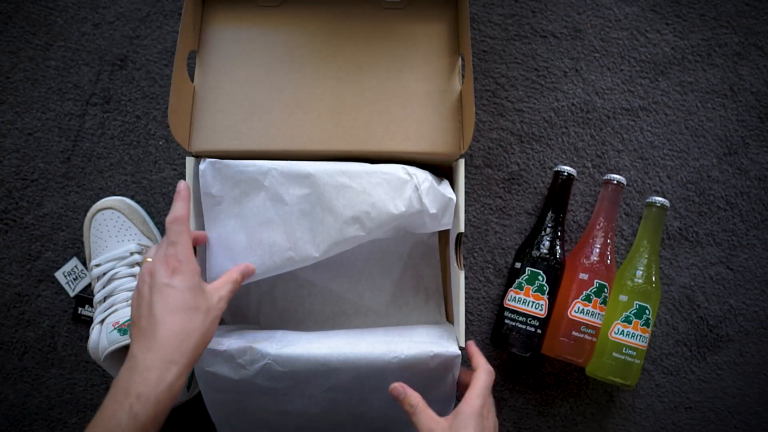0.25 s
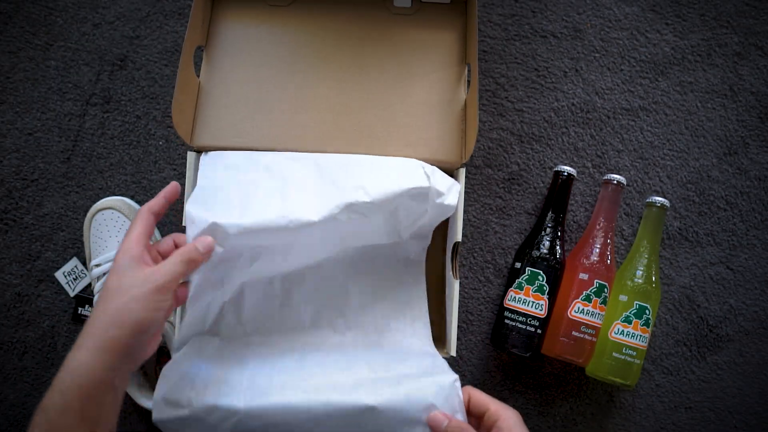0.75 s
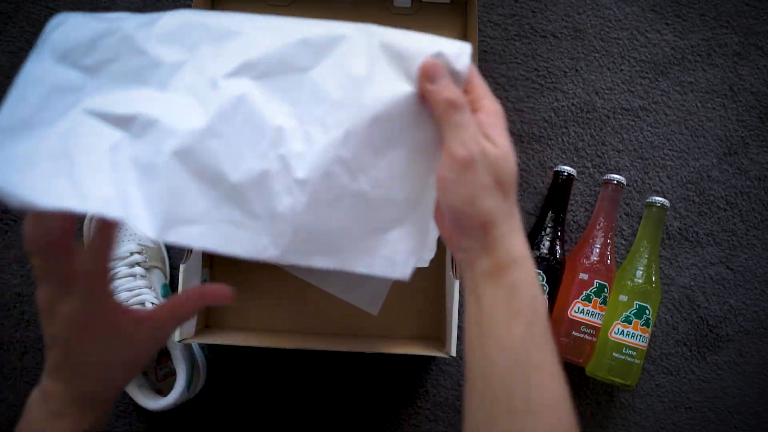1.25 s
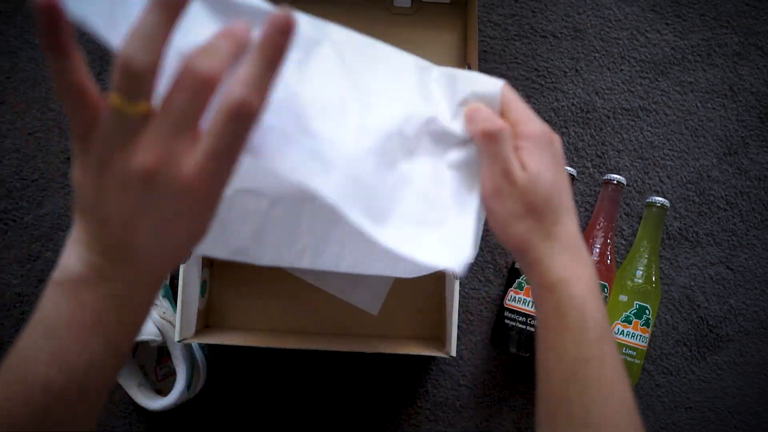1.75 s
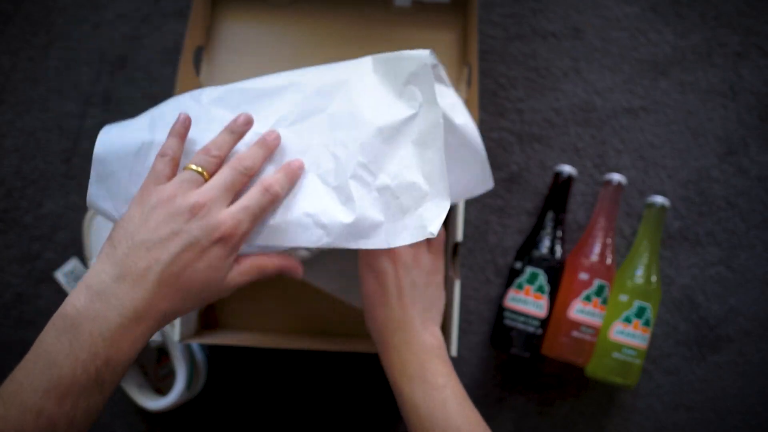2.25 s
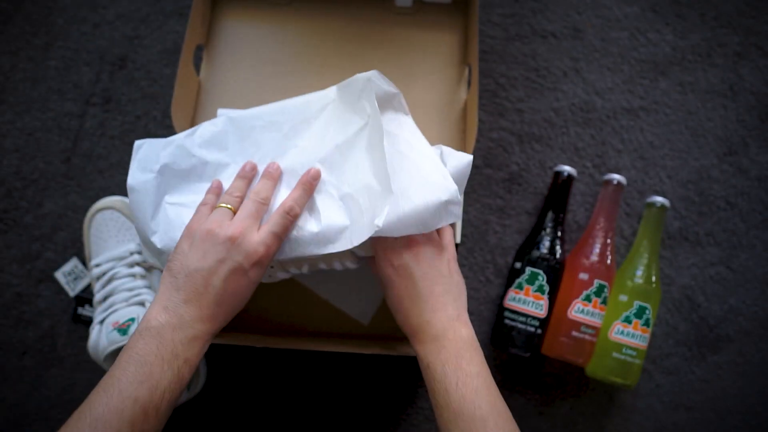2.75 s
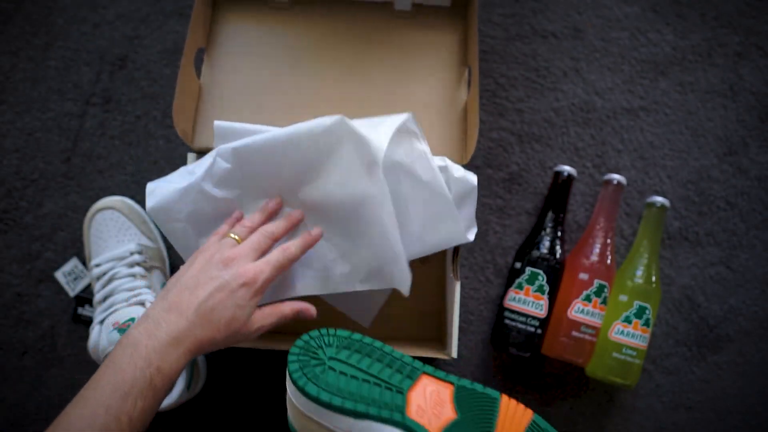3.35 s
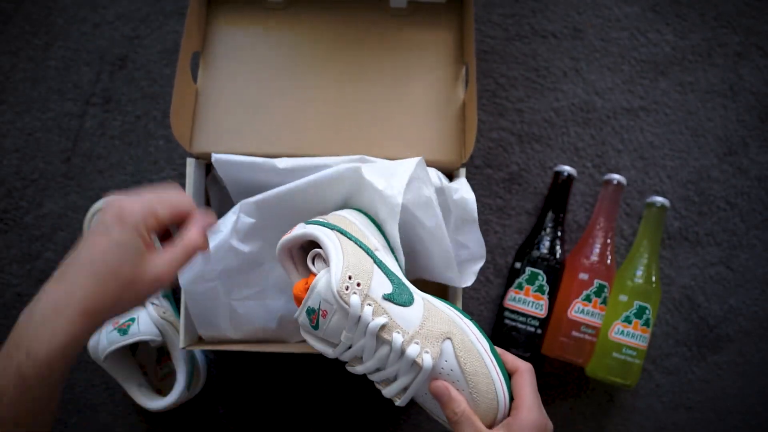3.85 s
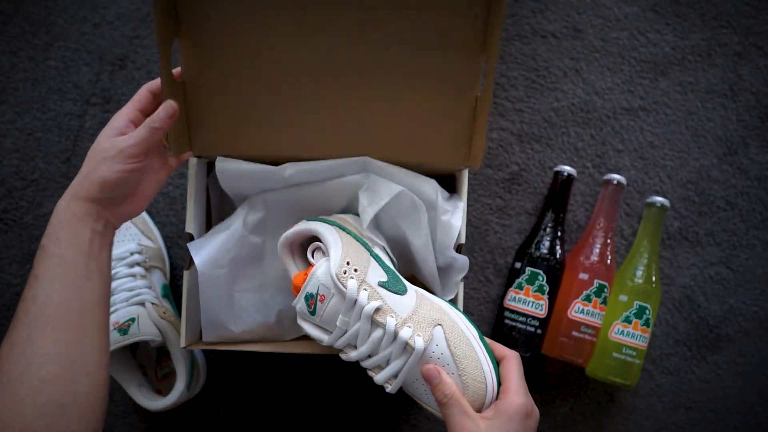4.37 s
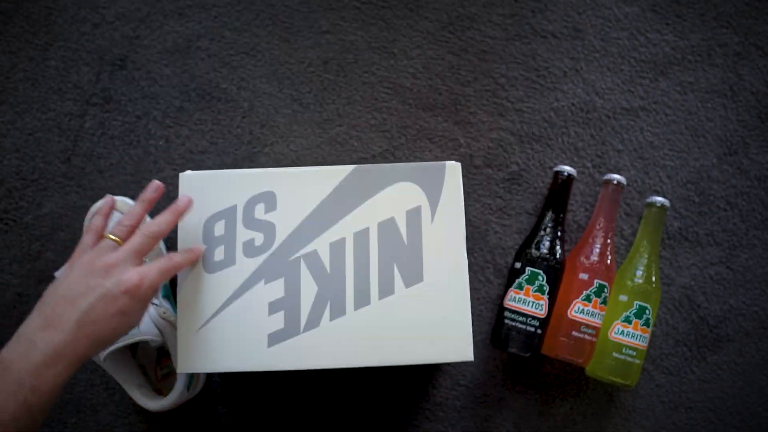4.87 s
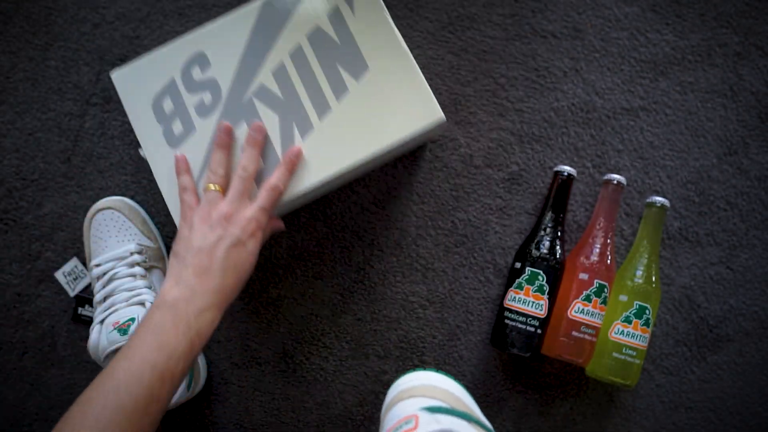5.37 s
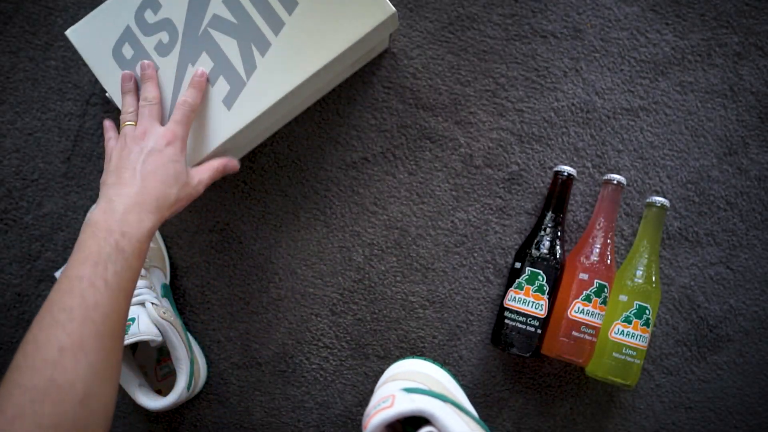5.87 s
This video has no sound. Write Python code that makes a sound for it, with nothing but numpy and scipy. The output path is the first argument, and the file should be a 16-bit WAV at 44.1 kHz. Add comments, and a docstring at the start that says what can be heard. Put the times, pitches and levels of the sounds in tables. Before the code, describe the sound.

Tissue paper dominates, bright and near: gusts of tiny crackles, larger creases snapping, loose sheets flapping. Hollow knocks sound on the box midway as a shoe comes out. After a last burst of crumpling come sparse slides and a soft lid closure, then quiet finger taps, rubbing and a short rough push over carpet, in a small carpeted room heard in close stereo.

```python
"""Close to a cardboard shoe box in a small, soft room: hands fold back its tissue paper, which rustles as a
swarm of tiny buckling creases while large creases snap; a shoe is lifted out and knocks ring the panels. Then,
as the lid closes, the paper mostly swishes, by band noise that is mostly even sliding, and a few creases still
snap. Last, nails click and skin rubs on the lid, and the box is pushed over carpet in stick-slip noise. Faint
air noise lies under it all; a stereo microphone with two ports hears it."""
import sys
import numpy as np
from scipy import signal
from scipy.fft import rfft, irfft, next_fast_len
from scipy.io import wavfile
from scipy.ndimage import uniform_filter1d, map_coordinates

SR = 44100
rng = np.random.default_rng(int(sys.argv[2]) if len(sys.argv) > 2 else 0)


def persist_wave(psi):
    """Save psi, clipped to +-1, as 16-bit WAV."""
    counts = np.round(np.clip(psi, -1, 1) * 32767).astype(np.int16)
    wavfile.write(sys.argv[1], SR, np.atleast_2d(counts).T)


N = 269705
TIME = np.arange(N) / SR
TOP_HZ = 16100  # top of the rustle and of the recorder

# large creases snapping: t/s, level over 6 ms before colouring/dB, crack re sheet ring/dB,
# power decay time/ms, left minus right/dB
LARGE_CREASES = [(0.3451, -28, 28, 3.9, 9.5), (0.3688, -28, 16, 1, 0), (0.3832, -19, 19.5, 3, 3.5),
                 (0.4772, -17, 18.5, 2.5, 2), (0.504, -20.5, 18.5, 1.8, 3), (0.5257, -19.5, 11, 1.5, 2),
                 (0.6597, -21, 3, 1, 0), (0.6995, -20.5, 20, 1.6, 3), (0.848, -32, 7, 0.6, -6.5),
                 (0.8623, -25.5, 3, 2.1, 0.5), (0.879, -22.5, 46, 0.81, -10),
                 (0.8925, -21.5, 17.5, 1.7, 7.5), (0.954, -23, 27, 0.74, 5.5),
                 (1.016, -22.5, -3, 0.9, -1.5), (1.1013, -23, -3.5, 2.8, 0), (1.1597, -17, -2, 1.8, 1.5),
                 (1.222, -23, 14, 1.6, 5), (1.3443, -25.5, 26, 2.2, -12.5), (1.3965, -17, 10.5, 5.5, -1),
                 (1.451, -24.5, 16, 1.4, -1), (1.5123, -21, 17.5, 0.42, 2.5), (1.5514, -18, -6, 1.6, -1.5),
                 (1.651, -26, -2, 2, -3), (1.6647, -23.5, 7, 0.99, -4), (1.7058, -20, 5, 1.7, -.5),
                 (1.7687, -20, 9, 2.4, 1.5), (1.8393, -18.5, -1, 4.6, -0.5), (1.8227, -20.5, 10, 0.4, 1),
                 (1.9511, -26, 3.5, 1.2, 4.5), (2.1591, -16.5, 3, .55, 0.5), (2.1683, -28.5, 12.5, 0.54, 0),
                 (2.2053, -22, -1.5, 2.5, 6), (2.2483, -18, -5, 4.5, -4.5), (2.3997, -24, -3.5, 2, 1),
                 (2.4416, -27.5, 12, 4.1, 1.5), (2.5561, -23, -1, 2.5, -1.5),
                 (2.6075, -19.5, -7.5, 2.8, -1), (2.6392, -24, 10, 0.86, -4.5),
                 (2.707, -17.5, -1.5, 0.91, -.5), (2.807, -26.5, 15, 1.1, -1), (2.9824, -30.5, -13, 1.2, 2),
                 (3.0015, -21.5, 9, 1.2, -0.5), (3.027, -23.5, 10.5, 0.95, -2), (3.0615, -19, -11, 1.1, 2),
                 (3.086, -21, 15, 3.2, 2), (3.1166, -23, 3, 0.84, 0.5), (3.1507, -20, 4, 0.88, 2),
                 (3.2224, -24, -17, 1.8, -1), (3.32, -26.5, 2.5, 0.55, 0), (3.378, -23, 1, 3.3, 0.5),
                 (3.4423, -24, 2, 2, -5.5), (3.4684, -19, 1, 1.4, -3), (3.571, -18.5, 11, 2.5, -2),
                 (3.808, -36.5, -12, 5.4, -1), (3.8526, -19.5, -3.5, 5.6, 1.5), (3.8603, -17, 7, 5.4, 1),
                 (3.8961, -20, -15, 8.4, 1), (3.9258, -20.5, -6.5, 3, 0.5), (3.9727, -20.5, 2, 3.4, 1.5),
                 (4.0487, -22, 0, 4.2, 0), (4.0574, -25.5, 5, 0.98, 2), (4.09, -27, 3, 0.98, 4.5),
                 (4.1115, -17, 0.5, 3.5, 1), (4.1291, -22.5, 5.5, 1.5, 4.5), (4.168, -35.5, -7, 1.6, 7),
                 (4.2425, -40, -23, 1.3, 1.5), (4.361, -31.5, 5, 2.5, -3), (4.465, -39.5, -12, 1.9, -1),
                 (4.5574, -20.5, 0.5, 2.1, 2), (4.6927, -21, 5, 1.6, -6.5), (4.953, -32, 0.5, 3, 2)]
# hands bend and crush the sheet: t/s, swell/s, held/s, level/dB, crispness (treble)/dB, flap (bass)/dB
CRUSHES = [(.347, 0.0044, .12, -37, 1.5, -11), (.48, .006, 0.068, -28, 1.5, -10.5),
           (.58, 0.0094, 0.063, -34.5, -1.5, -19.5), (.658, 0.0039, 0.11, -31, -3, -12.5),
           (.765, 0.014, 0.013, -26, -1, -10.5), (.81, .01, 0.079, -28, -2, -16),
           (1.02, .006, 0.01, -27.5, -15.5, -16.5), (1.098, 0.013, 0.17, -30, -8, -14),
           (1.33, 0.011, 0.08, -31.5, -1, -14.5), (1.4, 0.0071, .16, -31, -1, -12.5),
           (1.6, 0.013, 0.065, -36.5, -2, -16), (1.72, .005, .035, -38, -3, -20),
           (1.835, 0.038, 0.043, -27, -0.5, -16.5), (2.074, 0.025, 0.0065, -32, -10, -27),
           (2.125, 0.021, 0.066, -27, -3.5, -19), (2.2, 0.0073, 0.064, -26.5, -2, -16.5),
           (2.335, 0.036, 0.083, -31, -8, -13.5), (2.44, .008, 0.083, -35, -4, -9.5),
           (2.56, 0.01, 0.092, -32.5, -3, -15.5), (2.695, 0.014, 0.052, -29, -2.5, -15.5),
           (2.775, 0.011, 0.063, -33, -5.5, -11), (2.87, 0.0099, 0.12, -37, -6, -4),
           (3.03, 0.017, 0.19, -41, 2, -17.5), (3.157, 0.012, 0.057, -29.5, -0.5, -8),
           (3.378, 0.037, 0.045, -35, -1, -18.5), (3.435, 0.011, 0.12, -30.5, -1, -14.5),
           (3.855, 0.0028, 0.077, -33, 1, -10.5), (3.95, 0.011, 0.19, -36.5, 1.5, -10)]
# the sheet slides over itself, the shoe or the closing lid: t/s, swell/s, held/s, level/dB,
# crispness (treble)/dB, flap (bass)/dB
SLIDES = [(0.1, 0.0057, 0.0018, -34.5, 0.5, -43), (.305, .004, .03, -61, -8, -20),
          (3.25, .02, 0.043, -44.5, 0, -15), (3.645, 0.016, 0.11, -42.5, -3, -18),
          (4.358, 0.025, 0.035, -42.5, -0.5, -20), (4.47, 0.042, 0.14, -45, -12.5, -17),
          (4.552, 0.046, 0.138, -37.5, 4, -13.5), (4.694, .004, 0.024, -27.5, -12, -19.5),
          (4.775, 0.022, 0.023, -39, -3.5, -30), (4.814, .007, 0.069, -37.5, 6, -25),
          (4.907, 0.044, 0.021, -32.5, -5.5, -8)]


def undb(db):
    """Decibels to gain."""
    return 10 ** (np.asarray(db) / 20)


def unit(x):
    """Scale to rms 1."""
    return x / np.sqrt(np.mean(x ** 2))


def at(points, hz):
    """Read a curve on a log-frequency axis."""
    f, value = np.transpose(points)
    return np.interp(np.log(np.maximum(hz, 1)), np.log(f), value)


def colour(x, points, size=2048):
    """Causal minimum-phase filter with the given spectrum; white noise keeps its power."""
    cepstrum = irfft(np.log(undb(at(points, np.fft.rfftfreq(size, 1 / SR)))))
    # fold the cepstrum onto positive time
    cepstrum[1:size // 2] *= 2
    cepstrum[size // 2 + 1:] = 0
    response = irfft(np.exp(rfft(cepstrum)))
    response = response[None] / np.linalg.norm(response)
    return signal.oaconvolve(x, response, axes=-1)[:, :x.shape[-1]]


def ears(pair):
    """Two unrelated signals become left and right: alike in the bass, apart in the treble."""
    # how unlike the two ears are: f/Hz, side re mid/dB
    side_level = [(100, -18.5), (300, -16.5), (700, -9), (1400, -9.5), (2800, -7), (5500, -3.5),
                  (14000, -3)]
    size = next_fast_len(N + SR // 10)
    mid, side = rfft(pair, size)
    width = undb(at(side_level, np.fft.rfftfreq(size, 1 / SR)))
    left_right = np.array([mid + width * side, mid - width * side])
    return irfft(left_right / np.sqrt(1 + width ** 2), size)[:, :N]


def add(track, s, sound):
    """Mix a sound in at a time."""
    start = max(int(s * SR), 0)
    part = track[:, start:start + sound.shape[-1]]
    part += sound[..., :part.shape[-1]]


def walk(rate):
    """Smooth random drift with `rate` knots a second, spread near 1."""
    knots = rng.standard_normal(int(N / SR * rate) + 2)
    line = np.interp(TIME * rate, np.arange(len(knots)), knots)
    return 1.2 * uniform_filter1d(line, int(SR / rate / 2))


def grains(rate, spread_db):
    """Sizes of random tiny clicks, `rate` a second: many small, a few large."""
    size_db = spread_db * np.minimum(rng.exponential(size=N), np.pi)
    return (rng.random(N) < rate / SR) * undb(size_db)


def swarm(clicks, ring_s, even_s):
    """Envelope of clicks that each ring briefly; its mean power stays near 1."""
    keep = np.exp(-1 / (ring_s * SR))
    power = signal.lfilter([1 - keep], [1, -keep], clicks ** 2) + 1e-6
    return np.sqrt(power / uniform_filter1d(power, int(even_s * SR) + 1))


def movement(s, swell_s, held_s, db, sag_db_per_s, release_s, settle_db, settle_s):
    """Power of one hand movement: a swell, a sagging hold, release and a faint settling tail."""
    since = TIME - s
    before = np.maximum(-since, 0)
    after = np.maximum(since - held_s, 0)
    hold = undb(db - sag_db_per_s * np.clip(since, 0, held_s))
    release = np.exp(-after / release_s)
    settling = undb(settle_db) * np.exp(-after / settle_s)
    return (hold * np.exp(-before / swell_s) * np.maximum(release, settling)) ** 2


def friction(table, shape, spectrum, rate, spread_db):
    """Two surfaces catch and slip in tiny uneven steps."""
    level = np.sqrt(sum(movement(*row, **shape) for row in table))
    slips = swarm(grains(rate, spread_db), ring_s=0.0014, even_s=0.094)
    return ears(colour(rng.standard_normal((2, N)) * slips * level, spectrum))


def still_air(level_db=-70.5):
    """Steady coloured noise for the still air around the box."""
    # noise of the air: f/Hz, level/dB
    air_spectrum = [(25, -20.5), (80, -11), (200, -4.5), (450, 3), (1000, 4), (2700, -5), (6000, -12),
                    (12000, -4.5), (16000, -22.5)]
    noise = ears(colour(rng.standard_normal((2, N)), air_spectrum))
    return undb(level_db) * unit(noise)


def room(x, level_db=-12, t60_s=0.4, treble_t60_s=0.38, gap_s=0.0058, split_hz=4500, treble_db=-4):
    """Walls answer after a path of some two metres; the carpet swallows the treble first."""
    t = TIME[:SR // 2]
    noise = rng.standard_normal((2, len(t)))
    low = signal.sosfilt(signal.butter(2, split_hz, fs=SR, output="sos"), noise)
    high = signal.sosfilt(signal.butter(2, split_hz, "high", fs=SR, output="sos"), noise[::-1])
    fade = np.exp(-np.log(1000) * t / t60_s) * (t > gap_s)
    treble_fade = np.exp(-np.log(1000) * t / treble_t60_s) * (t > gap_s)
    response = (low * fade + undb(treble_db) * high * treble_fade) / np.linalg.norm(fade)
    mono = x.mean(axis=0)[None]
    return undb(level_db) * ears(signal.fftconvolve(mono, response, axes=-1)[:, :N])


def carpet_shoves():
    """The card bottom of the box catches and slips over carpet as the box is shoved."""
    # shoves: t/s, swell/s, held/s, level/dB
    pushes = [(5.755, 0.031, 0.035, -43.5), (5.808, 0.0054, 0.0056, -34), (5.943, 0.0024, 0.0065, -49)]
    # card on carpet: f/Hz, level per Hz/dB
    card_spectrum = [(30, -36), (70, -23.5), (140, -14), (350, 4), (700, 2), (1000, 6), (1600, 4),
                     (2500, -0.5), (4000, -11.5), (7000, -28), (16000, -29)]
    shape = dict(sag_db_per_s=13, release_s=0.0091, settle_db=-28, settle_s=0.04)
    return friction(pushes, shape, card_spectrum, rate=2400, spread_db=4.0)


def finger_rubs():
    """Skin catches and slips over the smooth card of the lid."""
    # fingers rub the lid: t/s, swell/s, held/s, level/dB
    strokes = [(5.046, .003, 0.017, -52.5), (5.132, 0.0061, .055, -46.5), (5.298, .003, .02, -60),
               (5.716, 0.0082, .13, -51.5), (5.945, 0.0076, 0.048, -53.5)]
    # skin on smooth card: f/Hz, level per Hz/dB
    skin_spectrum = [(60, -34.5), (400, 1.5), (900, -14), (1500, 2), (2000, -7), (2650, 2.5), (3600, -10),
                     (5000, -6), (7000, -11.5), (12000, -6), (16000, -17)]
    shape = dict(sag_db_per_s=18, release_s=0.031, settle_db=-15, settle_s=0.19)
    return friction(strokes, shape, skin_spectrum, rate=3000, spread_db=6.0)


def taps(ring_s=0.0027):
    """A nail meets hard card: one short click of fading noise."""
    # fingertips and nails on the lid: t/s, level over 6 ms/dB
    touches = [(5.043, -41.5), (5.109, -45), (5.197, -44.5), (5.295, -47), (5.713, -49), (5.936, -56),
               (5.995, -46.5)]
    # their click: f/Hz, level/dB
    click_spectrum = [(60, -35), (500, -4), (1500, 3.5), (2700, 11), (4500, -6.5), (7000, -3.5),
                      (11500, -2), (16000, -11)]
    t = TIME[:SR // 30]
    out = np.zeros((2, N))
    for s, db in touches:
        click = rng.standard_normal((2, len(t))) * np.exp(-t / ring_s)
        first_6_ms = click[:, :SR // 167]
        add(out, s, undb(db) * click / np.std(first_6_ms))
    return ears(colour(out, click_spectrum))


def knocks(push_s=0.0029, scuff_s=0.027, scatter_db=4.0, detune=0.0099, order=6):
    """Each blow rings a range of the box's panel modes and scuffs the cardboard."""
    # panel modes of the box: f/Hz, level/dB, t60/s
    panel_modes = [(107, -13, .16), (147, -8.5, 0.14), (204, -7.5, 0.23), (257, -0.5, 0.061),
                   (317, -1, 0.15), (371.6, -1, 0.2), (414, 6, 0.11), (494.5, 10, 0.036), (572, 4, 0.079),
                   (717, 3, 0.094), (895, -5, .09), (1057, -13, .09)]
    # blows: t/s, level over 30 ms/dB, lowest f that the contact point drives/Hz,
    # highest f that its hardness reaches/Hz, scuff re ring/dB
    blows = [(0.514, -36.5, 294, 527, -14), (0.554, -39.5, 296, 527, -19), (2.914, -44.5, 335, 430, -27),
             (3.158, -34.5, 397, 650, -5), (3.176, -29.5, 392, 610, -18), (3.18, -51, 195, 217, -22),
             (3.53, -32, 425, 645, -31), (3.548, -55.5, 200, 218, -22), (4.9, -42, 265, 370, -7),
             (5.041, -57.5, 170, 580, 4), (5.07, -52, 290, 355, -18), (5.116, -44.5, 126, 362, -14),
             (5.151, -47, 220, 405, -24), (5.2, -41, 253, 420, -36), (5.294, -75, 274, 385, -8),
             (5.4, -66, 241, 300, -3), (5.582, -61, 140.3, 290, -5), (5.803, -42, 290, 1010, -9),
             (5.937, -39, 126, 344, -2.5), (5.999, -51.5, 148, 364, -17)]
    # dull scuff of a blow: f/Hz, level/dB
    scuff_spectrum = [(30, -36), (80, -41), (170, -9), (700, 2.5), (1300, -7.5), (2500, -8.5), (4500, -19),
                      (15000, -38)]
    hz, db, t60 = np.transpose(panel_modes)[:, :, None]
    t = TIME[:SR // 2]
    first = SR // 33  # 30 ms
    rings, scuffs = np.zeros((2, N)), np.zeros((2, N))
    for s, level_db, low_hz, high_hz, scuff_db in blows:
        size, shift, phase = rng.standard_normal((3, len(hz), 1))
        driven = 1 + (low_hz / hz) ** (2 * order) + (hz / high_hz) ** (4 * order)
        weight = undb(db + scatter_db * size) / np.sqrt(driven)
        tones = np.sin(2 * np.pi * (hz * (1 + detune * shift) * t + phase))
        modes = weight * tones * np.exp(-np.log(1000) * t / t60)
        # a soft contact builds up over a few ms
        ring = modes.sum(axis=0) * (1 - np.exp(-(t / push_s) ** 2))
        add(rings, s, undb(level_db) * ring / np.std(ring[:first]))
        scuff = rng.standard_normal((2, len(t))) * np.exp(-t / scuff_s)
        add(scuffs, s, undb(level_db + scuff_db) * scuff / np.std(scuff[:, :first]))
    return rings + ears(colour(scuffs, scuff_spectrum))


def handling():
    """Movements add in power, which also weights the mean crispness, flap and share of sliding."""
    # a crumple leaves the sheet settling faintly; a swish stops more cleanly
    crush_shape = dict(sag_db_per_s=0.5, release_s=0.029, settle_db=-14.5, settle_s=0.19)
    slide_shape = dict(sag_db_per_s=18, release_s=0.016, settle_db=-28.5, settle_s=0.05)
    # glide: share of the power that is even sliding rather than buckling (0-1)
    kinds = (CRUSHES, crush_shape, 0.15), (SLIDES, slide_shape, 0.75)
    power, blend = np.full(N, 1e-14), np.zeros((3, N))
    for table, shape, glide in kinds:
        for s, swell_s, held_s, db, crisp_db, flap_db in table:
            own = movement(s, swell_s, held_s, db, **shape)
            power += own
            blend += np.outer([crisp_db, flap_db, glide], own)
    return (10 * np.log10(power), *(blend / power))


def rustle(level_db, crisp_db, flap_db, glide, rate=800, spread_db=5.0, colour_db=0.5, ring_s=0.0013,
           drift_db=1.0):
    """Tiny creases buckle together, each with its own colour; big slow facets ring longer than small ones."""
    # rustle at zero crispness and flap: f/Hz, level per Hz/dB
    paper_spectrum = [(60, -91), (120, -77.5), (170, -48), (300, -32), (430, -29.5), (620, -30.5),
                      (870, -33), (1250, -38.5), (2000, -34), (2900, -36), (4300, -38.5), (6500, -40),
                      (10500, -39), (15000, -42)]
    clicks = grains(rate, spread_db)
    where = np.flatnonzero(clicks)
    out = np.zeros((2, N))
    for low in TOP_HZ / np.sqrt(2) ** np.arange(1, 17):  # half-octave bands
        high, hz = low * np.sqrt(2), low * np.sqrt(np.sqrt(2))
        own = clicks.copy()
        own[where] *= undb(colour_db * rng.standard_normal(len(where)))
        buckling = swarm(own, ring_s * np.sqrt(8000 / hz), even_s=0.034)
        envelope = np.sqrt(glide + (1 - glide) * buckling ** 2)
        db = level_db + at(paper_spectrum, hz)
        # taut paper hisses in the treble, a loose flapping sheet pushes air in the bass
        db = db + crisp_db * at([(3300, 0.21), (6500, 1)], hz)
        db = db + flap_db * at([(600, 0.88), (1250, 0.02)], hz)
        db = db + drift_db * walk(25)
        band = signal.butter(2, [low, high], "band", fs=SR, output="sos")
        out += signal.sosfilt(band, rng.standard_normal((2, N)) * envelope * undb(db))
    return ears(out * np.sqrt(SR / 2))  # from level per Hz to level per sample


def strain(before_db=-4, after_db=-2.0, before_s=0.0043, after_s=0.01):
    """Rustle level in dB: it dips as the sheet draws taut before a big snap, and less deeply just after."""
    t = np.arange(-SR // 16, SR // 16) / SR
    before = before_db * np.exp(-abs(t) / before_s)
    after = after_db * np.exp(-abs(t) / after_s)
    dip = np.where(t < 0, before, after)
    strongest_db = max(row[1] for row in LARGE_CREASES)
    db = np.zeros((1, N))
    for s, level_db, *_ in LARGE_CREASES:
        # weaker snaps dip less
        add(db, s + t[0], dip * undb((level_db - strongest_db) / 2))
    return db[0]


def bounce(x, lag_s=0.0018, share=0.36):
    """The cardboard mirrors the moving sheet: a short echo whose delay drifts combs the rustle."""
    delayed = np.arange(N) - SR * lag_s * np.exp(0.3 * walk(7))
    echo = np.array([map_coordinates(channel, [delayed], order=3) for channel in x])
    return (x + share * echo) / np.sqrt(1 + share ** 2)


def lesser_snaps(level_db, glide, count=70):
    """Lesser creases snap at random moments of the handling, as strong as the buckling just then."""
    over_rustle_db, scatter_db, pan_scatter_db = 3.5, 2, 4
    typical_ring_ms, typical_crisp_db, crisp_scatter_db = 1.5, 5, 7
    first, last = CRUSHES[0][0], SLIDES[-1][0]
    times = first + (last - first) * (np.arange(count) + rng.random(count)) / count
    rows = []
    for s, (size, crisp, ring, side) in zip(times, rng.standard_normal((count, 4))):
        i = int(s * SR)
        buckling_db = level_db[i] + 10 * np.log10(1 - glide[i])
        db = buckling_db + over_rustle_db + scatter_db * size
        crisp_db = typical_crisp_db + crisp_scatter_db * crisp
        rows.append((s, db, crisp_db, typical_ring_ms * np.exp(ring / 2), pan_scatter_db * side))
    return rows


def facet(burst, typical_hz=2900, scatter_oct=0.55, q=4, added_db=6):
    """The facet beside a crease rings too: add a resonant band at a pitch set by its random size."""
    hz = typical_hz * 2 ** (scatter_oct * np.clip(rng.standard_normal(), -2, 2))
    return burst + undb(added_db) * signal.lfilter(*signal.iirpeak(hz, q, fs=SR), burst)


def snaps(rows, sheet_db=-3.5, tick=0.94):
    """A large crease flips: a sharp crack, and a duller ring that dies as it spreads over the sheet."""
    # ring of the sheet: f/Hz, level/dB
    sheet_spectrum = [(30, -60.5), (100, -50.5), (300, -26), (700, 2), (1500, 4), (2900, 9.5), (4500, 2.5),
                      (7000, 5.5), (15000, -38.5)]
    # crack of the crease itself: f/Hz, level/dB
    crack_spectrum = [(60, -58), (300, -30.5), (2500, -2.5), (5000, 0.5), (7000, 0), (10500, 4),
                      (15500, -0.5)]
    t = TIME[:SR // 30]
    flip = 1 + tick * np.exp(-t / 0.0002)
    spread = 1 - np.exp(-t / 0.0004)
    sheet, crack, pan = np.zeros((2, N)), np.zeros((2, N)), np.zeros(N)
    for s, db, crisp_db, ring_ms, pan_db in sorted(rows):
        # energy of 6 ms at the given level, shared between ring and crack
        size = undb(db) * np.sqrt(0.006 * SR / (1 + undb(crisp_db) ** 2))
        fade = np.exp(-t * 1000 / (2 * max(ring_ms, 0.2)))
        ring = facet(rng.standard_normal((2, len(t))) * spread * fade)
        snap = rng.standard_normal((2, len(t))) * flip * fade
        for track, gain, burst in (sheet, undb(sheet_db), ring), (crack, undb(crisp_db), snap):
            add(track, s, size * gain * burst / np.linalg.norm(burst, axis=1, keepdims=True))
        pan[int(s * SR):] = pan_db  # holds until the next snap
    both = ears(colour(sheet, sheet_spectrum) + colour(crack, crack_spectrum))
    return both * undb(np.array([pan, -pan]) / 2)


def scene():
    """Still air, box and paper, with the answer of the room."""
    air = still_air()
    # a light sheet and panels this small hardly radiate deep bass
    thuds = signal.sosfilt(signal.butter(3, 85, "high", fs=SR, output="sos"), knocks())
    box = thuds + taps() + finger_rubs() + carpet_shoves()
    level_db, crisp_db, flap_db, glide = handling()
    rustling = bounce(rustle(level_db, crisp_db, flap_db, glide) * undb(strain()))
    snapping = snaps(LARGE_CREASES + lesser_snaps(level_db, glide))
    paper = signal.sosfilt(signal.butter(1, 90, "high", fs=SR, output="sos"), rustling + snapping)
    return paper + box + room(paper + box) + air


def ports(x):
    """The paper lies off the axis of the two microphone ports: phase and level differ with frequency."""
    # lead of the left port: f/Hz, phase/rad
    port_lead = [(100, 0.2), (300, 0.32), (600, 0.24), (1400, 0.07), (2700, 0.17), (8000, -.5),
                 (15000, -1.3)]
    # balance of the ports: f/Hz, left minus right/dB
    port_level = [(200, 0.8), (2400, -.5), (4400, 1.6), (8000, 1), (15000, 2.3)]
    size = next_fast_len(N + SR // 10)
    hz = np.fft.rfftfreq(size, 1 / SR)
    left = undb(at(port_level, hz) / 2) * np.exp(1j * at(port_lead, hz) / 2)
    return irfft(rfft(x, size) * np.array([left, 1 / left]), size)[:, :N]


def record(dry):
    """The recorder's two ports hear the scene; the very highest peaks are rounded off, and the recorder cuts
    the top."""
    heard = ports(dry)
    rounded = heard / (1 + (heard / 0.8) ** 6) ** (1 / 6)
    return signal.sosfilt(signal.ellip(10, 0.1, 70, TOP_HZ, fs=SR, output="sos"), rounded)


dry = scene()
out = record(dry)
persist_wave(out)
```